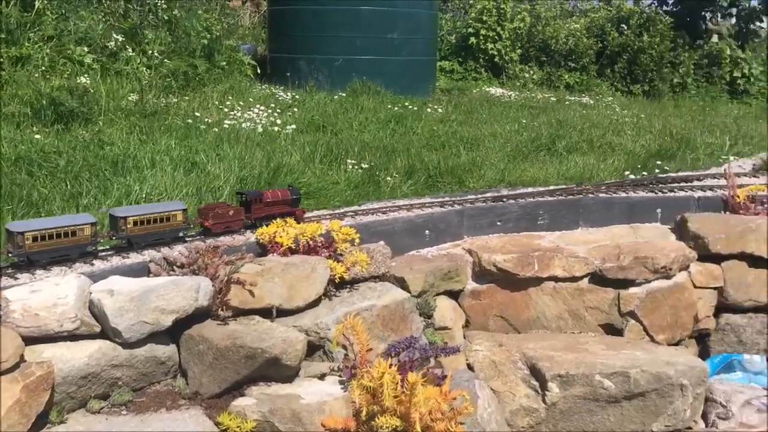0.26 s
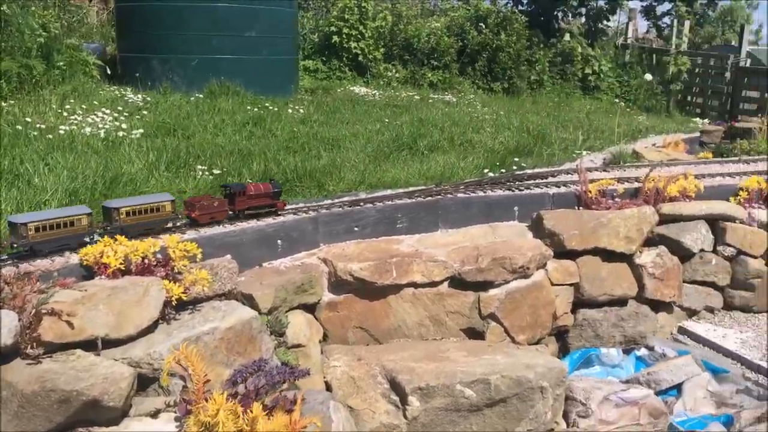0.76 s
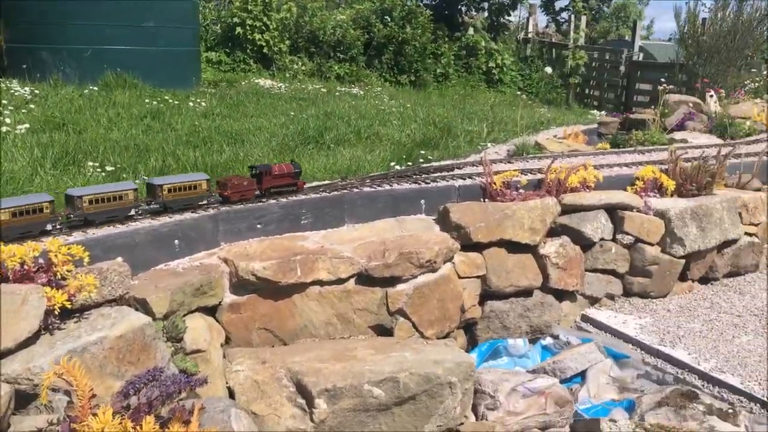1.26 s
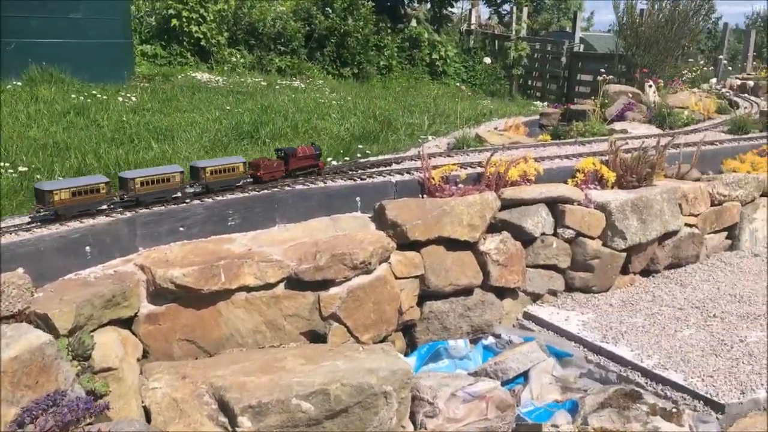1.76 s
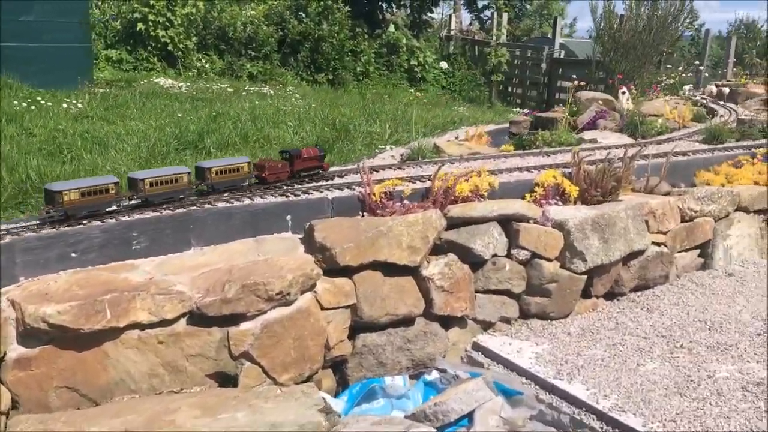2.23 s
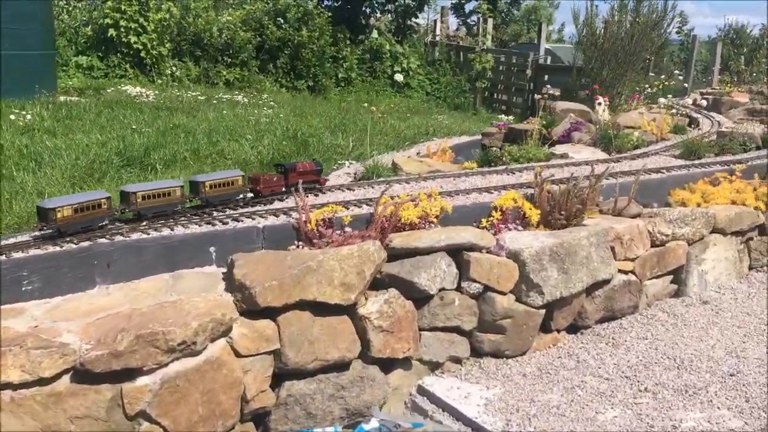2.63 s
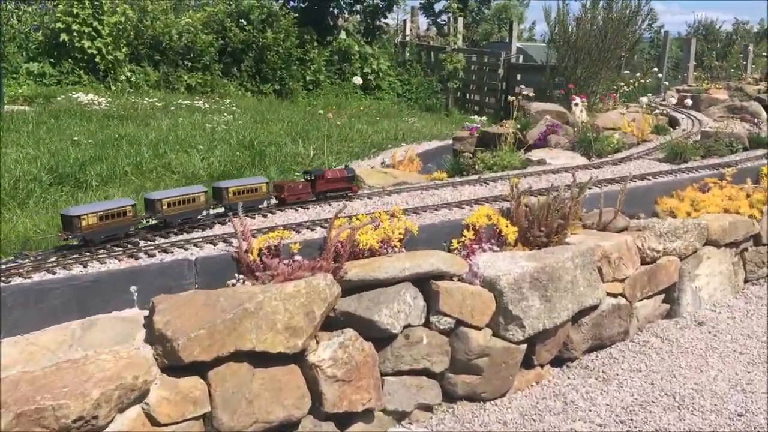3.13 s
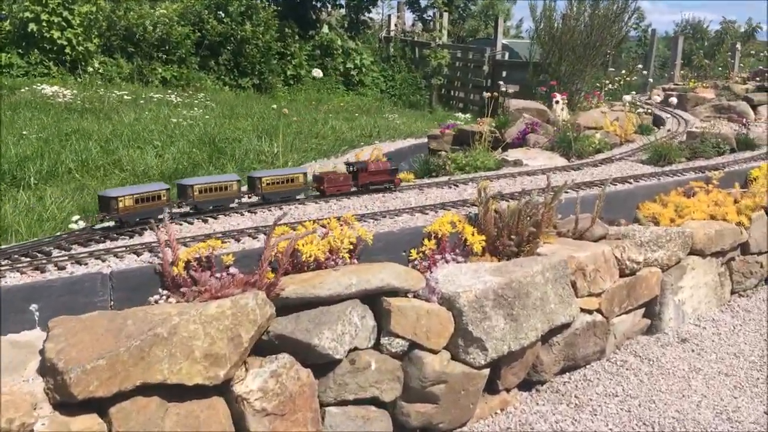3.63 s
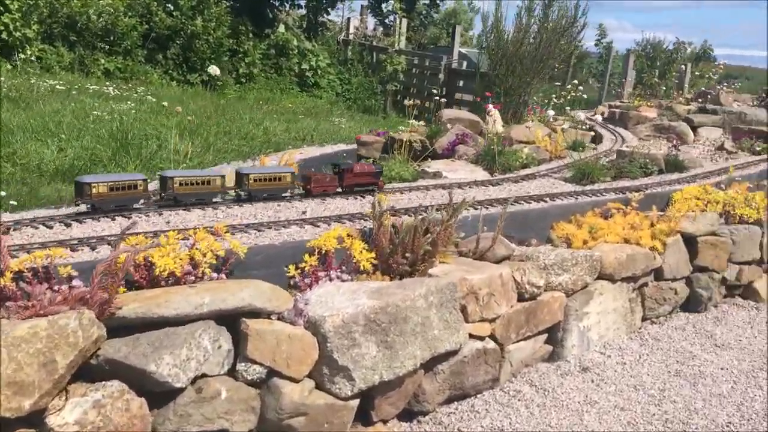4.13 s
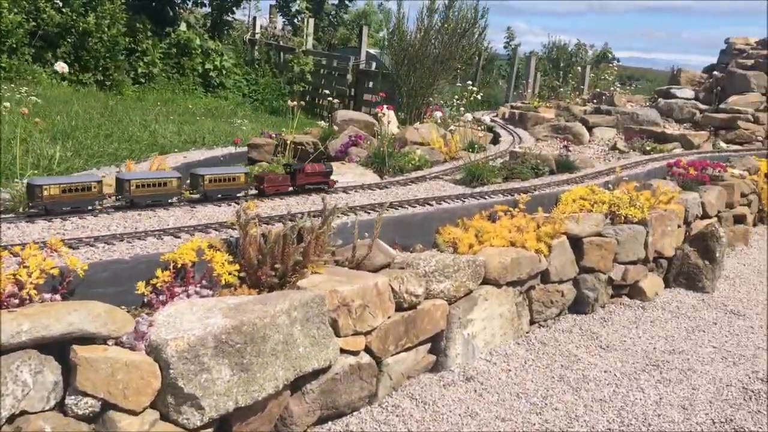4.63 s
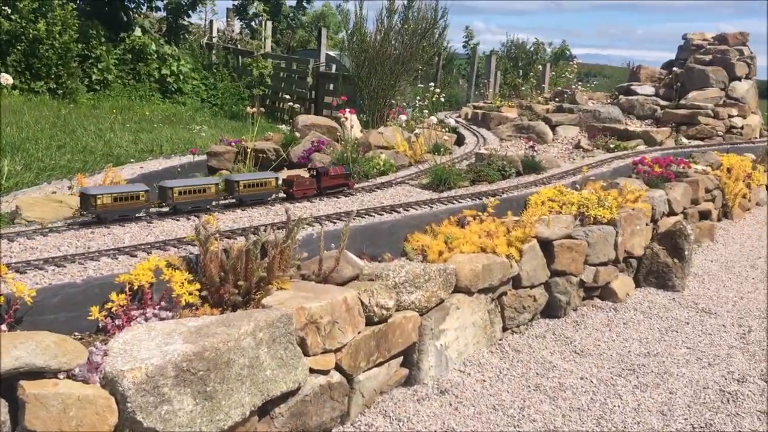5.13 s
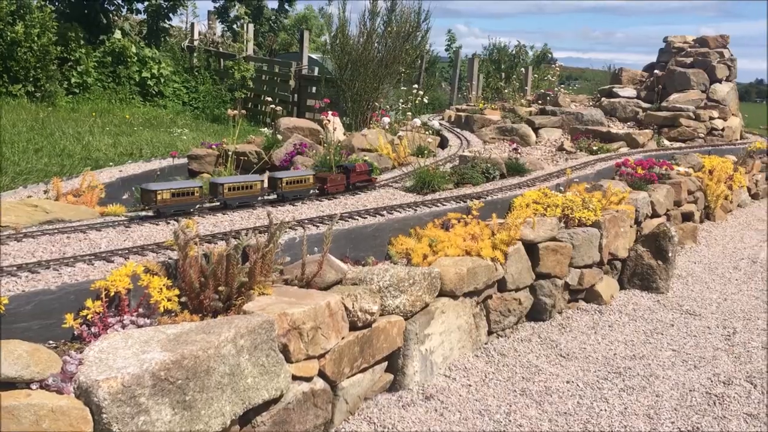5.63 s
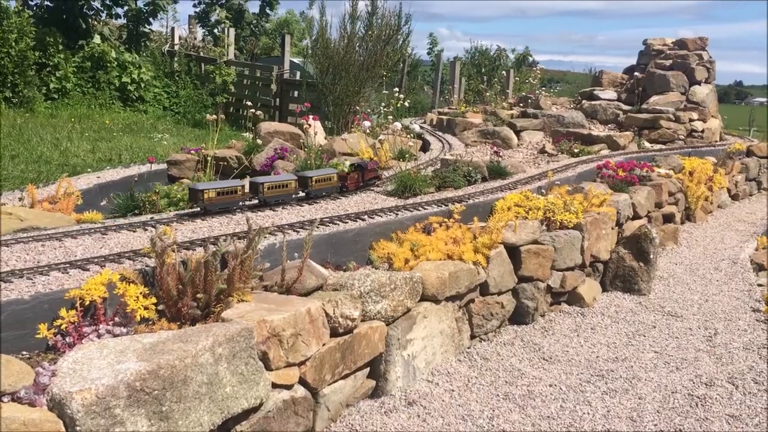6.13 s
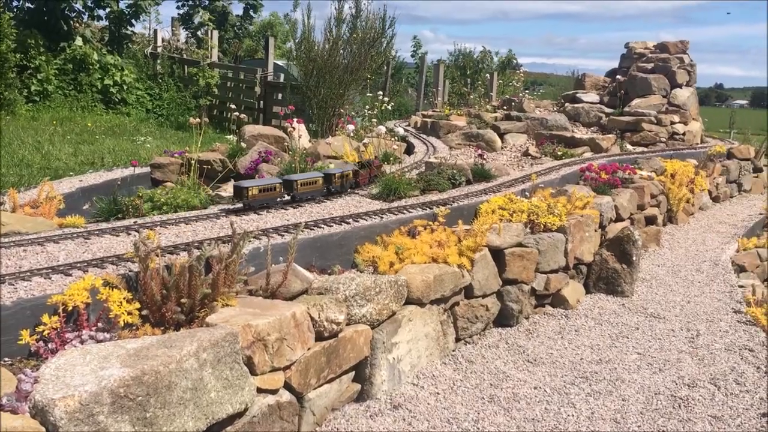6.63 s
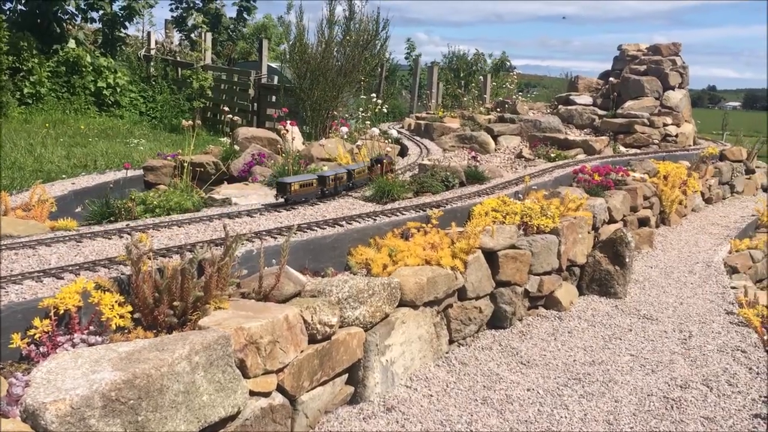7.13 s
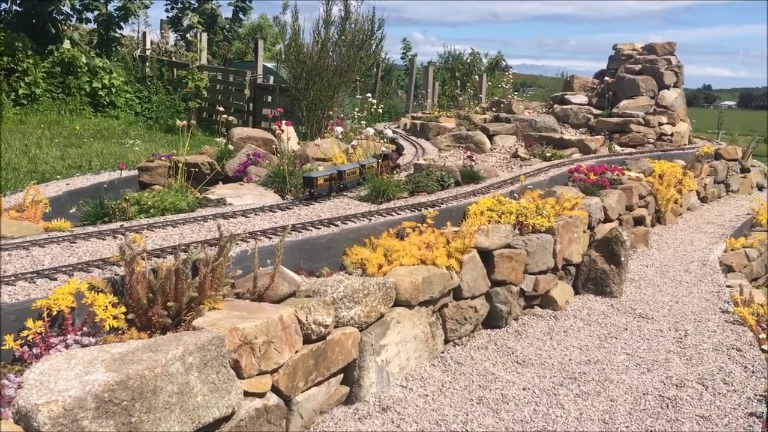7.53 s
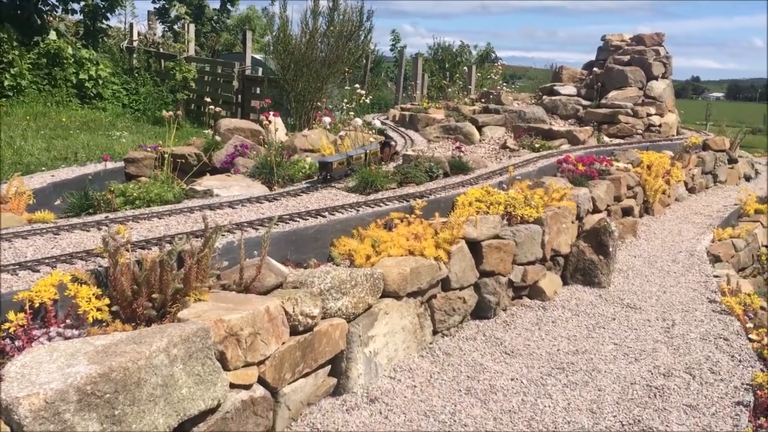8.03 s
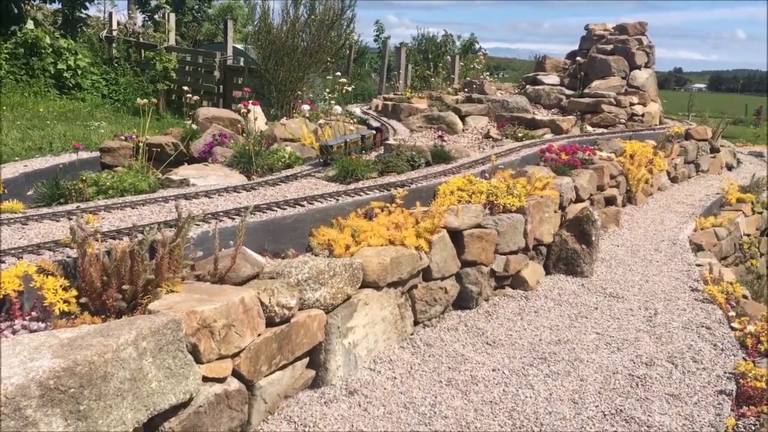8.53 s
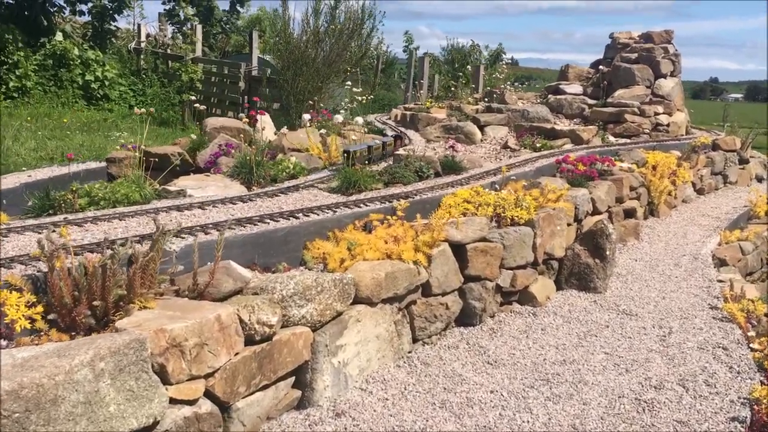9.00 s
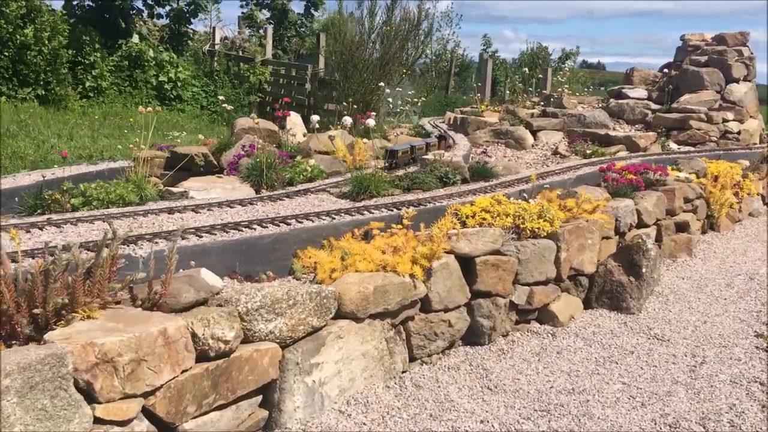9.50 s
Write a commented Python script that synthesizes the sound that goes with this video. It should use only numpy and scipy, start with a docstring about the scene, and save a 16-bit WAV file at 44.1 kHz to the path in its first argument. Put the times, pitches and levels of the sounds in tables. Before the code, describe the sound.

Bright tinny clockwork chatter of a small toy train runs away outdoors, growing faint under low wind rumble, buffets and soft leaf rustle.

```python
"""A clockwork tinplate train whirs and chatters at once, runs away outdoors and dulls behind the plants.
Shaped noise, shaken by gear teeth and random impacts, drives its tin, bodies, frame and wheels.
Rail joints add noise crashes and decaying wheel tones; flanges rub at the end, over a wash of leaves.
Wind rumbles on the microphone as gusted low noise; eddy pulses make buffets, and short low-passed
bursts through port resonances make two sharp pops. A thin squeak and dry ticks are band-passed bursts."""
import sys
import numpy as np
from scipy import signal
from scipy.fft import rfft, irfft
from scipy.io import wavfile
from scipy.ndimage import uniform_filter1d

SR = 44100
rng = np.random.default_rng(int(sys.argv[2]) if len(sys.argv) > 2 else 0)


def generate_wav(sig):
    """Save sig (samples, or channels by samples) to the path in sys.argv[1] as 16-bit PCM at SR."""
    pcm = np.round(np.clip(np.atleast_2d(sig).T, -1, 1) * 32767).astype(np.int16)
    wavfile.write(sys.argv[1], SR, pcm)


N = 430416
EDGE_HZ = 15850
TIME_S, FREQ_HZ = np.arange(N) / SR, np.fft.rfftfreq(N, 1 / SR)


def gain_of(db):
    """Amplitude factor of a level in dB."""
    return 10 ** (np.asarray(db) / 20)


def unit_rms(x):
    """Scales to an RMS of 1."""
    return x / np.sqrt(np.mean(x ** 2) + 1e-20)


def follow(curve):
    """A curve's value at every sample, linear between points."""
    return np.interp(TIME_S, *np.transpose(curve))


def spectrum_gain(points):
    """Gain at every frequency, in dB linear over log frequency."""
    hz, db = np.transpose(points)
    return gain_of(np.interp(np.log(FREQ_HZ + 1), np.log(hz + 1), db))


def resonances(modes):
    """Summed gain of resonance peaks at every frequency."""
    return sum(gain_of(db) / (1 + ((FREQ_HZ - hz) / (width_hz / 2)) ** 2) for hz, width_hz, db in modes)


def colour(x, gain):
    """Filters x by a gain per frequency, keeping the power of white sound."""
    return irfft(rfft(x) * unit_rms(gain), N)


def noise(count=N):
    """White noise of unit power."""
    return rng.standard_normal(count)


def drift(rate_hz):
    """Slow random signal of unit RMS, low-passed at rate_hz."""
    return unit_rms(irfft(rfft(noise()) / (1 + (FREQ_HZ / rate_hz) ** 4), N))


def butter(order, edge_hz, kind, x):
    """Butterworth filter of x."""
    return signal.sosfilt(signal.butter(order, edge_hz, kind, fs=SR, output="sos"), x)


def add(mix, start_s, sound):
    """Adds a sound into the mix in place."""
    part = mix[max(round(start_s * SR), 0):][:len(sound)]
    part += sound[:len(part)]


def dying(t60_s, count=8000):
    """Exponential decay from 1, down 60 dB at t60_s."""
    return np.exp(-np.log(1000) * TIME_S[:count] / t60_s)


def random_hits(per_s, spread_db, most):
    """Impulses at chance times; sizes spread exponentially in dB, up to `most` spreads."""
    return (rng.random(N) < per_s / SR) * gain_of(spread_db * np.minimum(rng.exponential(1, N), most))


def chatter(per_s, spread_db, t60_s):
    """Power of many small impacts, each dying away in the tin; mean 1."""
    blows = random_hits(per_s, spread_db, most=3)
    power = abs(signal.oaconvolve(blows ** 2, dying(t60_s) ** 2)[:N])
    return power / power.mean()


def patchy(x, depth_db, full_hz, size, count):
    """Random level patches a few bins wide and some frames long, fading out below full_hz."""
    hz, _, frames = signal.stft(x, SR, nperseg=size)
    patch = np.outer(np.hanning(6), np.hanning(count))
    field = unit_rms(signal.fftconvolve(rng.standard_normal(frames.shape), patch, "same"))
    depth = np.minimum(hz / full_hz, 1)[:, None]
    return signal.istft(frames * gain_of(depth_db * field * depth), SR, nperseg=size)[1][:N]


def eddy(hz):
    """A passing eddy pushes, then pulls on the diaphragm; small fast ones sound higher. Peak 1, centred."""
    u = 2 * np.pi * hz * (TIME_S[:4000] - TIME_S[2000])
    return u * np.exp((1 - u ** 2) / 2)


# rattle strength, falling as the train runs away: time_s, level_db (relative)
RATTLE_LEVEL = [(0.0, -39), (0.41, -39), (1.5, -42), (3.18, -45), (4.49, -42.5), (4.95, -44.5), (5.38, -42),
                (5.93, -47.5), (6.2, -46), (6.39, -52.5), (6.85, -54.5), (7.69, -53), (8.62, -58),
                (9.76, -53.5)]
# drumming of the hollow bodies: time_s, level_db (relative)
DRUMMING_LEVEL = [(0, -42), (.5, -43), (1.1, -44.5), (1.4, -53), (2, -49.5), (2.6, -51), (3.9, -58),
                  (4.15, -48), (4.65, -43), (5, -48.5), (5.5, -45.5), (5.9, -56), (6.4, -62.5), (9.76, -74)]
# how far plants and stones hide the train: time_s, share (0-1)
HIDDEN_SHARE = [(0, 0), (5.7, 0.34), (5.95, 0.25), (6.38, 0.54), (6.42, 1), (9.76, 1)]
# rattle spectrum in plain view: freq_hz, per_hz_db (relative)
OPEN_SPECTRUM = [(250, -21), (450, -12), (850, -1), (1550, -2.5), (1950, -2), (2400, -6), (3600, -1.5),
                 (4800, -2.5), (6200, -1), (7500, -6.5), (8500, -1), (10500, -4), (12900, -1.5),
                 (15600, -10)]
# rattle spectrum behind the plants: freq_hz, per_hz_db (relative)
BEHIND_SPECTRUM = [(300, -14), (1000, 2.5), (1500, -3), (1950, 0.5), (2550, -9), (3100, 2.5), (3750, 2.5),
                   (5200, -7.5), (6350, 0), (7500, -2.5), (8800, -0.5), (12300, -1), (14000, -4),
                   (15600, -6)]
# resonances of the tin bodies: freq_hz, width_hz, gain_db (relative)
BODY_MODES = [(1110, 440, -11.5), (1497, 210, 2), (1734, 280, -6), (1900, 190, 0.5), (2984, 56, -9),
              (4224, 320, -3.5), (5710, 580, -1.5), (12700, 640, -15.5)]
# resonances of the frame: freq_hz, width_hz, gain_db (relative)
FRAME_MODES = [(3161, 94, 6.5), (3675, 68, 6), (6320, 130, -3), (8920, 590, -9), (12300, 230, 5)]
# ring of a wheel, also played by joints(): freq_hz, level_db (relative), t60_s
WHEEL_MODES = [(2750, -6, 0.12), (4330, -28, 0.036), (5270, 13.5, 0.069), (5840, 14, 0.031),
               (6800, 20, 0.022), (7000, 5, 0.083), (9560, 8.5, 0.063), (10030, -11, .07), (9800, 6, 0.092),
               (11200, -5, 0.11)]


def train(rattle_db=-0.5, sing_db=-18, frame_db=-15, knock_db=-5):
    """The vibration sounds through thin sheet, hollow bodies, frame and wheels."""
    shake = shaking()
    crash, ring = joints()
    strength = gain_of(follow(RATTLE_LEVEL))
    hidden = np.clip(follow(HIDDEN_SHARE), 0, 1)
    audible = FREQ_HZ < EDGE_HZ

    drive = gain_of(rattle_db) * strength * shake * noise() + crash
    tin_open = colour(drive, spectrum_gain(OPEN_SPECTRUM) * audible)
    tin_behind = colour(drive, spectrum_gain(BEHIND_SPECTRUM) * audible)
    tin = (1 - hidden) * tin_open + hidden * tin_behind

    # the joints set off the drumming too
    booming = np.sqrt(shake) * noise() + gain_of(knock_db) * crash / strength
    drum = gain_of(follow(DRUMMING_LEVEL)) * colour(booming, resonances(BODY_MODES) * audible)

    # on the far curve the joints clang in the frame
    frame_drive = gain_of(frame_db) * strength * shake * noise() + hidden * crash
    frame = colour(frame_drive, resonances(FRAME_MODES))

    wheel_peaks = [(hz, 3 / t60_s, db) for hz, db, t60_s in WHEEL_MODES]
    wheels = colour(strength * shake * noise(), resonances(wheel_peaks))
    return glitter(tin + drum) + frame + ring + gain_of(sing_db) * wheels


def shaking(tooth_hz=283, tooth_depth=0.43, wobble=0.062, gears_db=-3, wheels_db=-1.0, ticks_db=-8):
    """Vibration strength: meshing gear teeth, bouncing wheels and ticking loose parts."""
    speed_hz = tooth_hz * (1 + wobble * drift(rate_hz=7.5))
    teeth = 1 + tooth_depth * np.cos(2 * np.pi * np.cumsum(speed_hz) / SR)
    wheels = chatter(per_s=110, spread_db=3, t60_s=0.055)
    loose = chatter(per_s=280, spread_db=6.0, t60_s=0.016)
    power = (gain_of(gears_db) * teeth) ** 2
    power += gain_of(wheels_db) ** 2 * wheels
    power += gain_of(ticks_db) ** 2 * loose
    return unit_rms(np.sqrt(power))


# wheels strike the wider joints: start_s, level_db, wheel_ring_db, treble_db (all dB relative)
WIDE_CLACKS = [(0.201, -33.5, -18, -2), (0.267, -29.5, -19, 0), (0.4437, -32.5, -20, -4),
               (2.029, -33.5, -31, 3), (2.259, -38.5, -15.5, 8), (2.355, -33.5, -23, 1),
               (2.453, -32.5, -35, 10), (2.5114, -36.5, -19, 3), (2.5518, -37, -35, 2),
               (2.732, -25, -16, 3.5), (3.384, -35.5, -17, -2.5), (3.4605, -32.5, -21, 1.5),
               (3.4898, -26, -14, 6.5), (3.579, -31, -35, 6), (3.649, -38, -33, 4), (3.7225, -38.5, -34, 7),
               (4.1, -41, -23, -2), (4.604, -32, -28, 5), (4.749, -38, -26, -1.5), (4.787, -45, -31, 4),
               (5.273, -37.5, -17, 16), (5.405, -35.5, -14, 2), (5.487, -34.5, -21, 9),
               (5.777, -36, -27, 1), (5.991, -36, -26, 7), (6.165, -37.5, -30, 7), (6.2075, -35, -25, 8),
               (6.3334, -33, -27, 6), (6.369, -42.5, -27, 1), (7.896, -36.5, -36, 6.5),
               (8.262, -44.5, -35, -1.5)]


def joints(t60_s=0.13, snap_t60_s=0.013, snap_db=3, rise_s=0.0013, crash_db=-2.0, ring_db=11,
           build_s=0.0088, split_hz=7000):
    """Each joint sets off a short tinny crash and rings a wheel; returns both."""
    crash, ring, t = np.zeros(N), np.zeros(N), TIME_S[:8000]
    crash_envelope = (1 - np.exp(-t / rise_s)) * (dying(t60_s) + gain_of(snap_db) * dying(snap_t60_s))
    ring_build = 1 - np.exp(-t / build_s)  # builds up as the wheel bounces
    for start_s, level_db, wheel_db, treble_db in WIDE_CLACKS + small_clacks():
        low = butter(3, split_hz, "low", noise(8000))
        high = butter(3, split_hz, "high", noise(8000))
        burst = unit_rms(low + gain_of(treble_db) * high)
        add(crash, start_s, gain_of(level_db + crash_db) * crash_envelope * burst)
        modes = sum(gain_of(db) * dying(decay_s) * np.sin(2 * np.pi * (hz * t + rng.random()))
                    for hz, db, decay_s in WHEEL_MODES)
        add(ring, start_s, gain_of(level_db + wheel_db + ring_db) * ring_build * modes)
    return crash, ring


def small_clacks(per_s=5, above_rattle_db=2.5, spread_db=0.5, ring_db=-28, treble_db=4):
    """Light knocks of the tighter joints, uneven in time, following the rattle level; rows like WIDE_CLACKS."""
    count = int(TIME_S[-1] * per_s)
    place, size, wheel = rng.uniform(-1, 1, (count, 3)).T
    start_s = (np.arange(count) + (1 + place) / 2) / per_s
    level_db = np.interp(start_s, *np.transpose(RATTLE_LEVEL)) + above_rattle_db + spread_db * size
    wheel_db = ring_db + 2 * spread_db * wheel
    return list(zip(start_s, level_db, wheel_db, np.full(count, treble_db)))


def glitter(x):
    """Blows favour changing sheet modes, most in the treble; reflections shift as the train moves."""
    x = patchy(x, depth_db=1.9, full_hz=13000, size=256, count=5)
    return patchy(x, depth_db=3.0, full_hz=820, size=2048, count=7)


# flanges rub on the far curve: time_s, level_db
SCRAPE_LEVEL = [(0, -93), (8.9, -66), (9.1, -58), (9.4, -60), (9.76, -55.5)]


def flanges(hz=1370, width_hz=330):
    """Wheel flanges rub unevenly on the tight curve: chattering noise in one resonance."""
    slips = np.sqrt(chatter(per_s=210, spread_db=-1.5, t60_s=0.039))
    return gain_of(follow(SCRAPE_LEVEL)) * colour(slips * noise(), resonances([(hz, width_hz, 0)]))


# a thin squeak and two dry ticks: start_s, peak_db, freq_hz, width_hz, t60_s
TICK_EVENTS = [(6.496, -37, 11800, 500, 0.023), (9.4, -40, 1940, 900, 0.022),
               (9.426, -32, 3350, 2820, 0.053)]


def ticks():
    """Brief decaying noise bursts, each in one broad band."""
    out = np.zeros(N)
    for start_s, peak_db, hz, width_hz, t60_s in TICK_EVENTS:
        band_hz = [hz - width_hz / 2, hz + width_hz / 2]
        tick = butter(2, band_hz, "band", noise(8000) * dying(t60_s))
        add(out, start_s, gain_of(peak_db) * tick / abs(tick).max())
    return out


# sharp pops of air in the microphone port: start_s, level_db, length_s, upper_edge_hz
POP_EVENTS = [(2.105, -23, 0.012, 1000), (2.1244, -17, 0.0075, 1940), (2.136, -35, 0.015, 1500),
              (2.149, -34, 0.013, 1390), (3.2282, -23.5, 0.0069, 1350), (3.237, -25, 0.011, 1520),
              (3.251, -36, 0.019, 1420)]
# resonances of port and casing: freq_hz, width_hz, gain_db
PORT_MODES = [(233, 100, 0), (434, 37, -2), (500, 77, 0.5), (625, 100, 0.5), (763, 47, -0.5), (968, 23, 1),
              (1315, 130, -2), (1740, 37, -2)]


def pops(edge_db=-19, direct_db=-11):
    """Air catches the port for a moment and rattles its resonances."""
    out = np.zeros(N)
    for start_s, level_db, length_s, top_hz in POP_EVENTS:
        burst = noise(4000) * np.exp(-(TIME_S[:4000] / length_s) ** 4)
        puff = butter(8, top_hz, "low", burst) + gain_of(edge_db) * butter(4, 2 * top_hz, "low", burst)
        pop = gain_of(direct_db) * puff
        for hz, width_hz, db in PORT_MODES:
            pop += gain_of(db) * signal.lfilter(*signal.iirpeak(hz, hz / width_hz, SR), puff)
        # level_db is the RMS over length_s
        add(out, start_s, gain_of(level_db) * pop * np.sqrt(length_s * SR / np.sum(pop ** 2)))
    return out


# large eddies hit the microphone: centre_s, level_db (peak before the bass cut), freq_hz (first step)
BUFFET_EVENTS = [(1.326, -28, 80.5), (2.14, -23, 67.5), (2.363, -31.5, 69), (2.695, -28.5, 95),
                 (3.53, -27, 77), (3.954, -25, 85), (4.02, -27, 84.5), (4.3, -26, 67.6), (4.563, -25.5, 67),
                 (4.832, -35.5, 165), (4.901, -32, 148), (5.219, -24.5, 125), (5.457, -25, 81.5),
                 (5.856, -23.5, 95), (5.891, -27.5, 234), (6.124, -31.5, 194), (6.336, -24.5, 99),
                 (6.481, -34.5, 114), (6.61, -29.5, 63), (7.853, -26, 89), (7.883, -27.5, 157),
                 (7.934, -26, 135), (8.005, -18, 150), (8.146, -19, 109), (8.18, -30.5, 145),
                 (8.541, -33.5, 137), (8.955, -31.5, 100), (9.504, -32.5, 87)]


def buffets(step_s=0.016, step_db=-7.5, pitch_ratio=1.11, cut_hz=48, count=3):
    """Large eddies break up into smaller, faster ones, left swinging by the microphone's bass cut."""
    out = np.zeros(N)
    for centre_s, level_db, hz in BUFFET_EVENTS:
        for step in range(count):
            late_s = step * step_s * (1 + (rng.random() - 0.5) / 2)
            push = gain_of(level_db + step * step_db) * rng.choice([-1, 1])
            add(out, centre_s + late_s - TIME_S[2000], push * eddy(hz * pitch_ratio ** step))
    return butter(3, cut_hz, "high", out)


# low wind turbulence: freq_hz, per_hz_db (relative)
RUMBLE_SPECTRUM = [(12, -56), (22, -26), (33, -21), (46, 8), (65, 8), (100, -1.5), (160, -11), (250, -24),
                   (400, -41.5), (800, -58)]


def rumble(level_db=2.5, lumps_db=3, eddies_db=-13, eddies_per_s=8, spread_db=5.0):
    """Low turbulence under a spatter of small eddies, both following the wind force."""
    low = colour(noise(), spectrum_gain(RUMBLE_SPECTRUM)) * gain_of(lumps_db * drift(rate_hz=16))
    # the wind force alone sets the slow level
    low /= np.sqrt(uniform_filter1d(low ** 2, size=9000) + 1e-9)
    spatter = np.zeros(N)
    for hz, db in [(85, -19.0), (115, -1.5), (150, 2.0)]:
        hits = gain_of(db) * random_hits(eddies_per_s, spread_db, most=2) * np.sign(noise())
        spatter += signal.oaconvolve(hits, eddy(hz), "same")
    return wind_force() * (gain_of(level_db) * low + gain_of(eddies_db) * unit_rms(spatter))


# gusts on the microphone: full_s (swell complete), hold_s, level_db (relative)
GUST_EVENTS = [(0.15, 0.63, -51), (1.665, 0.71, -48.5), (2.627, 0.13, -41.5), (2.901, 0.42, -37.5),
               (3.689, 0.83, -42), (4.532, 0.75, -39), (5.357, 0.16, -43.5), (5.852, 0.29, -39.5),
               (6.302, 0.275, -42.5), (7.198, 0.48, -54), (7.835, 0.11, -33.5), (8.08, 0.22, -43.5),
               (8.5, 0.33, -42), (8.934, 0.63, -44.5)]


def wind_force(rise_s=0.059, fall_s=0.039, lull_db=-56.5):
    """Each gust swells, holds and dies away over a light steady wind; powers add."""
    power = gain_of(lull_db) ** 2
    for full_s, hold_s, level_db in GUST_EVENTS:
        swell = np.clip(1 + (TIME_S - full_s) / rise_s, 0, 1)
        fade = np.exp(-np.maximum(TIME_S - full_s - hold_s, 0) / fall_s)
        power = power + (gain_of(level_db) * swell * fade) ** 2
    return np.sqrt(power)


# breeze in the hedges: time_s, level_db (before patches)
BREEZE_LEVEL = [(0, -52.5), (5, -52.5), (6.6, -52.5), (7.3, -54.5), (8.3, -56), (8.8, -55.5), (9.2, -57),
                (9.76, -58)]
# spectrum of the leaves: freq_hz, per_hz_db (relative)
LEAF_SPECTRUM = [(60, 15), (300, -7), (550, -14.5), (720, -7), (880, 5), (1100, 2), (1400, 1), (1700, -9),
                 (2500, -18), (6000, -41.5), (15000, -108)]


def hedges():
    """A soft, distant wash of leaves: shaped noise with random patches of level."""
    leaves = colour(noise(), spectrum_gain(LEAF_SPECTRUM))
    return gain_of(follow(BREEZE_LEVEL)) * patchy(leaves, depth_db=4.0, full_hz=790, size=2048, count=7)


def scene():
    """Train, ticks, wind and leaves in one channel."""
    return (train() + flanges() + ticks() + pops() + buffets() + rumble() + hedges())[None]


def record(dry):
    """The recorder's band limit: a low-pass FIR at EDGE_HZ."""
    low_pass = signal.firwin(511, EDGE_HZ, window=("kaiser", 9), fs=SR)
    return signal.oaconvolve(dry, low_pass[None], "same")


dry = scene()
out = record(dry)
generate_wav(out)
```